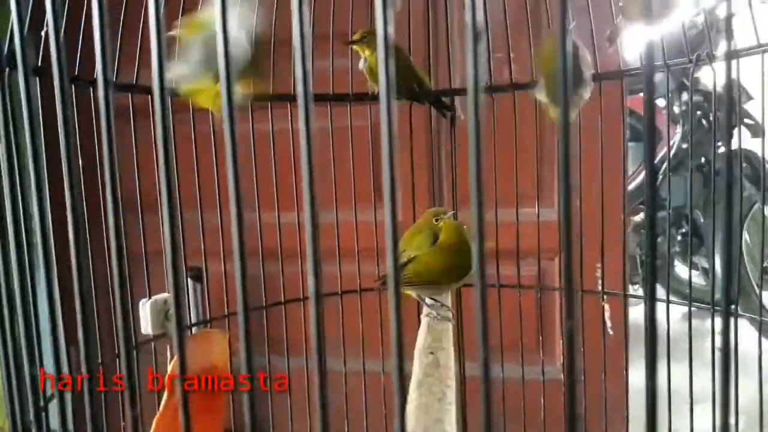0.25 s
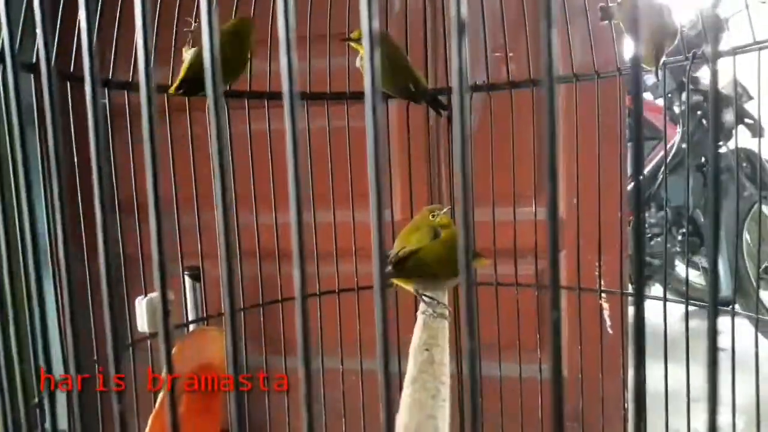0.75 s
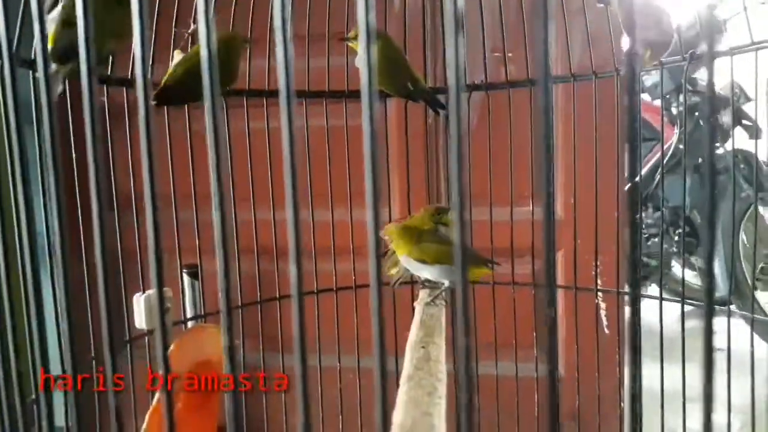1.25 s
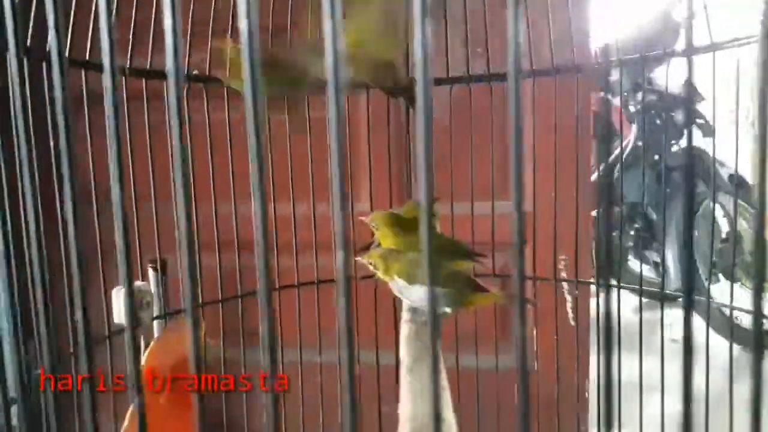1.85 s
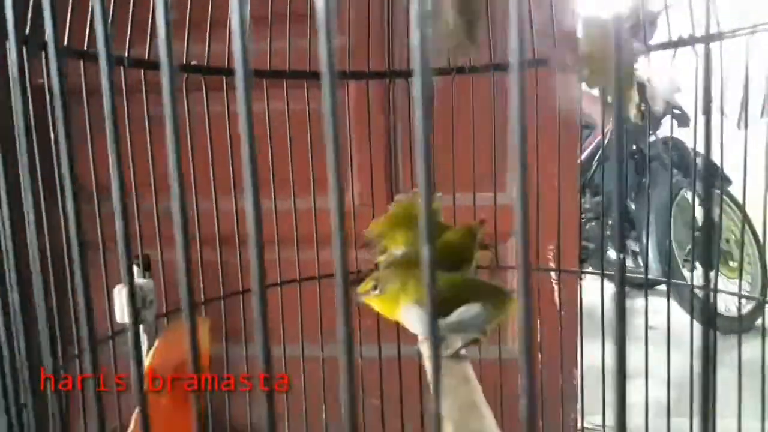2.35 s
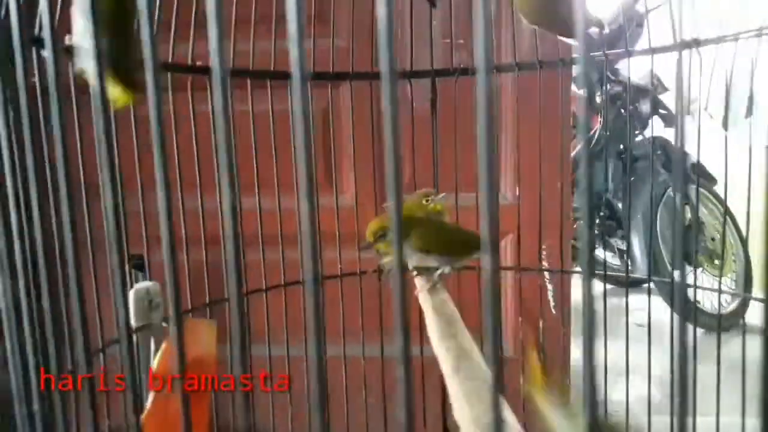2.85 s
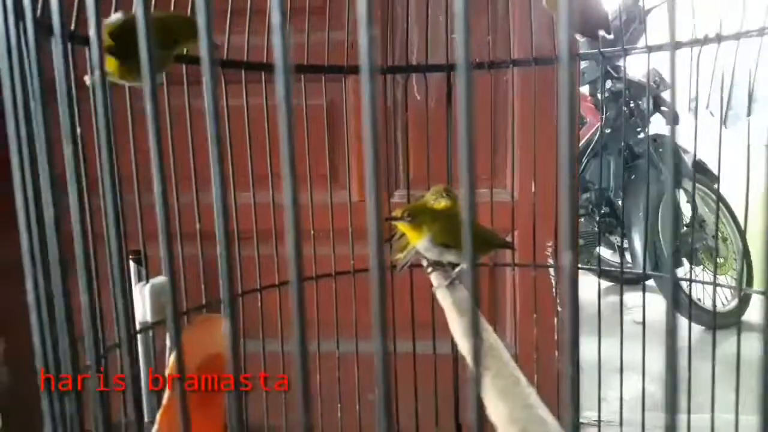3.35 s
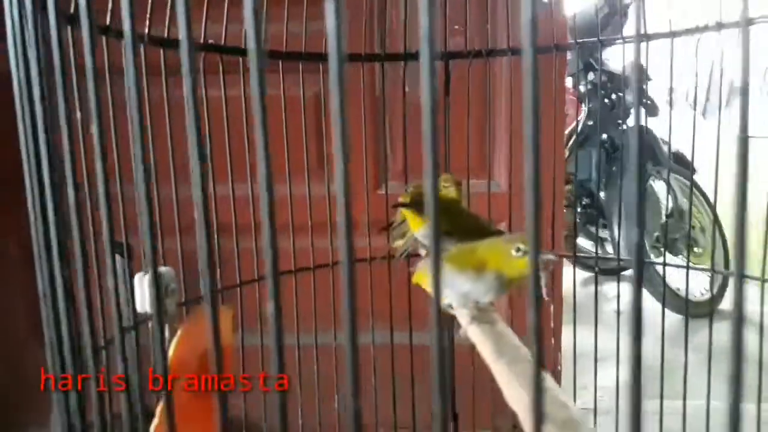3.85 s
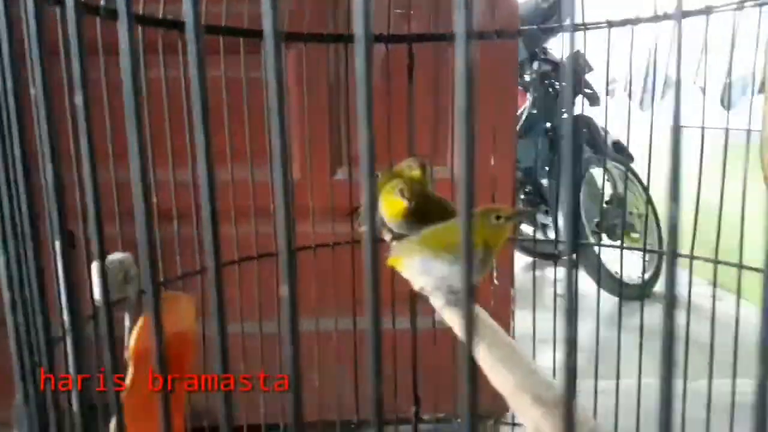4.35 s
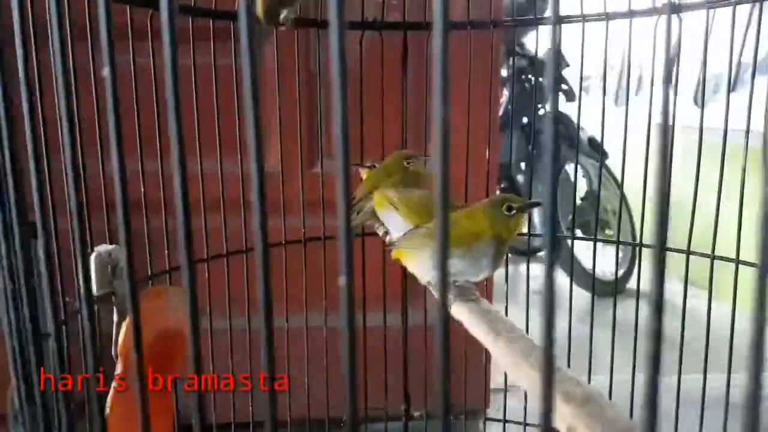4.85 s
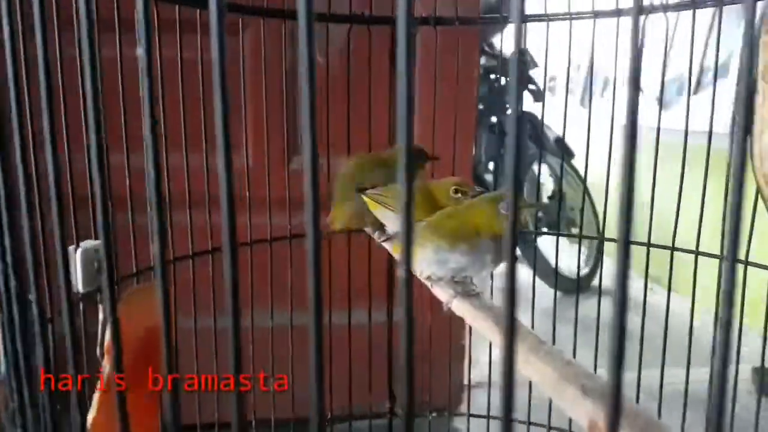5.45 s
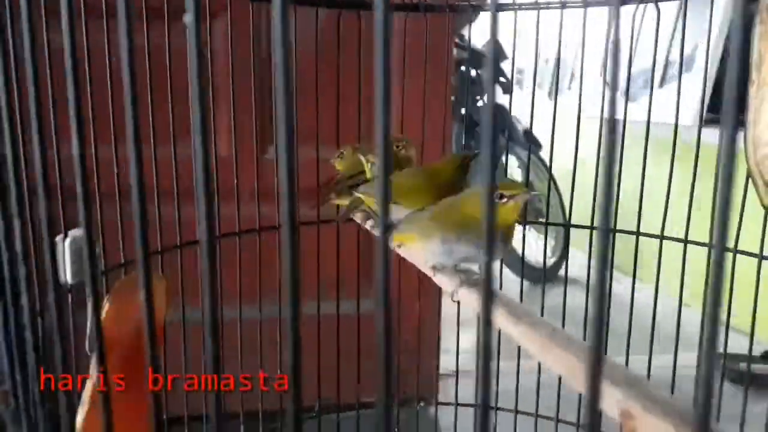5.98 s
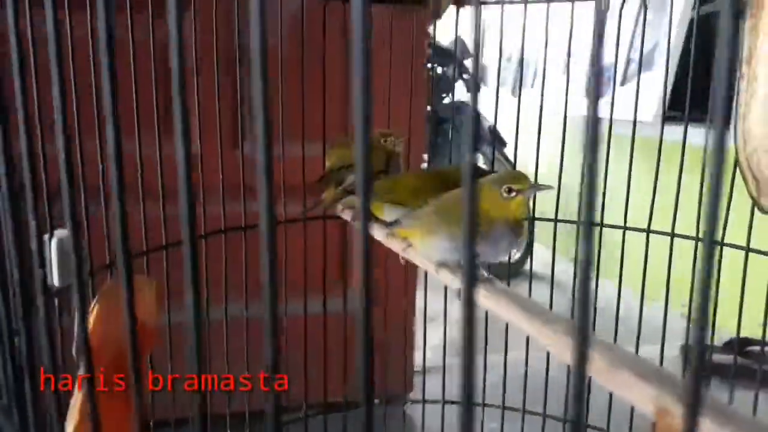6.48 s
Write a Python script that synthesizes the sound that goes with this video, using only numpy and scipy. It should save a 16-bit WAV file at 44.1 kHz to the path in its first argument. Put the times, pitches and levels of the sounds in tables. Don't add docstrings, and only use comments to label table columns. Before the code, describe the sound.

Loud, slightly buzzy chirps slide downward on the left, answered by a reedy bird mid-stage and fainter echoing ones right, in a hard-walled porch.

```python
import sys
import numpy as np
from scipy import signal
from scipy.io import wavfile
from scipy.ndimage import uniform_filter1d, map_coordinates

SR = 44100
rng = np.random.default_rng(int(sys.argv[2]) if len(sys.argv) > 2 else 0)


def generate_wav(sig):
    pcm = np.round(np.clip(np.atleast_2d(sig).T, -1, 1) * 32767).astype(np.int16)
    wavfile.write(sys.argv[1], SR, pcm)


def boost(x):
    u = np.asarray(x, float) / 20
    return 10 ** u


N = 296352


def along(points, hz):
    f, v = np.transpose(points)
    return np.interp(np.log(hz + 1), np.log(f + 1), v)


def wobble(rate_hz, size=N):
    knots = rng.standard_normal(int(size * rate_hz / SR) + 4)
    return map_coordinates(knots, [np.arange(size) * rate_hz / SR])


def level(rows):
    return boost(np.interp(np.arange(N) / SR, *np.transpose(rows)))


def rush(spectrum, alike, patchy_db):
    hz, _, z = signal.stft(rng.standard_normal((2, N)), SR, nperseg=1024)
    field = rng.standard_normal(z.shape[1:])
    field = uniform_filter1d(uniform_filter1d(field, size=8, axis=0), size=5, axis=1)
    patches = boost(patchy_db * field / field.std())
    turn = np.arccos(np.clip(along(alike, hz), -1, 1)) / 2
    colour = boost(along(spectrum, hz)) * np.array([np.cos(turn), np.sin(turn)])
    mid, side = signal.istft(z * colour[..., None] * patches, SR, nperseg=1024)[1][:, :N]
    pair = np.array([mid + side, mid - side])
    return pair / pair.std()


def whistles(calls, trill_hz, trill_depth, scoop, jitter, flutter_db, overtones=(), edge=0.00038,
             lead=0.000964, settled=0.76, calm_s=0.059, wander=0.811, pulse_db=0, scoop_s=.004):
    out = np.zeros(N + SR)
    for call in calls:
        s, hz, db = np.transpose(call)
        t = np.arange(max(s[0] - lead, 0), s[-1], 1 / SR)
        size = len(t)
        age, left = t - t[0], t[-1] - t
        note_hz, note_db = np.interp(t, s, hz), np.interp(t, s, db)
        onset = np.exp(-(age / scoop_s) ** 2) * (t[0] > .01)
        fresh = settled + np.exp(-age / calm_s)

        rate_hz = trill_hz * (1 + 0.11 * wobble(26, size))
        turn = 2 * np.pi * np.cumsum(rate_hz) / SR - np.pi * (1 + .08 * rng.standard_normal())
        trill = fresh * (1 - onset) * (np.sin(turn) - .25 * np.sin(2 * turn))

        shake = fresh * wobble(299.7, size) + wander * wobble(45.62, size)
        end_drop = 0.056 * np.exp(-left / 0.0042)
        bend = trill_depth * trill + jitter * shake - scoop * onset - end_drop
        phase = 2 * np.pi * np.cumsum(note_hz * (1 + bend)) / SR
        tone = boost(-21 * onset) * np.sin(phase)

        lead_db = 8 * np.exp(-age / .04)
        rasp = .2 + 1.1 * np.exp(-age / .05)
        sung_db = .6 * (db.max() - note_db)
        for multiple, over_db in overtones:
            onset_db = onset * (13 if multiple == 2 else -20)
            unsteady_db = 3 * wobble(70, size)
            gain_db = over_db + lead_db * (1 + multiple % 1) + onset_db + sung_db + unsteady_db
            tone += boost(gain_db) * np.sin(multiple * phase + rasp * wobble(900, size))

        flutter = fresh * wobble(148.3, size) + 0.16 * trill
        gain = boost(note_db + 4.5 + flutter_db * flutter + pulse_db * (trill - fresh + settled))
        fade = np.clip(np.minimum(2 * age, left) / edge, 0, 1)
        out[round(t[0] * SR):][:size] += tone * gain * fade
    return out[:N]


def falls(rows, hold, sag, ease=1, swell_db=0, fade_db=0):
    u = np.linspace(0, 1, num=16)
    up = (1 - np.clip((u - hold) / (1 - hold), 0, 1) ** ease) ** sag
    shape_db = -swell_db * (1 - u) ** 4 - fade_db * u ** 4
    calls = []
    for s, size, top, end, db in rows:
        hz = end + (top - end) * up
        calls.append(np.transpose([s + size * u, hz, db + shape_db]))
    return calls


def swells(rows, rise, hold, start_db, end_db):
    shape = [(0, start_db), (rise, 0), (rise + hold, 3), (1, end_db)]
    return [[(s + u * size, hz, db - less) for u, less in shape] for s, size, hz, db in rows]


def rings(events, attack, t60, blur):
    out, t = np.zeros(N + SR), np.arange(SR // 3) / SR
    for s, db, hz in events:
        phase = 2 * np.pi * hz * np.cumsum(1 + blur * wobble(120, len(t))) / SR
        decay = boost(db - 60 * t / t60)
        out[round(s * SR):][:len(t)] += decay * (1 - np.exp(-t / attack)) * np.sin(phase)
    return out[:N]


# frequency in Hz, t60 in seconds.
PORCH_T60 = [(1000, 1), (3500, 0.35), (5500, 0.36), (12000, 0.31)]


def porch(x, wet_db, early=0.0067, count=3):
    out, turn = 0, (np.arange(N) // (SR // 5)) % count
    for k in range(count):
        hz, t, z = signal.stft(rng.standard_normal(SR * 2 // 3), SR, nperseg=256)
        decay = boost(-60 * t / along(PORCH_T60, hz)[:, None])
        tail = signal.istft(z * decay, SR, nperseg=256)[1]
        tail = tail * (1 + 1.4 * np.exp(-np.arange(len(tail)) / SR / early))
        share = uniform_filter1d((turn == k) * 1., size=900)
        delayed = np.pad(tail, (60, 0)) / np.linalg.norm(tail)
        out = out + signal.fftconvolve(x * share, delayed)[:N]
    return boost(wet_db) * out


# frequency in Hz, density in dB per Hz.
STREET_SPECTRUM = [(35, -17), (88, -11.5), (150, 1.5), (660, -8), (770, -6.5), (1430, -7.5), (1890, -6.5),
                   (4340, -9), (5140, -10), (6000, -47), (7800, -49), (13200, -120)]
# time in seconds, level in dB.
STREET_LEVEL_DB = [(0.0, -41), (0.56, -44), (6.72, -42.5)]
# frequency in Hz, left-right likeness from 0 to 1.
STREET_ALIKE = [(100, 0.76), (500, 0.61), (1500, 0.92), (4000, 0.89), (12000, 0.61)]
# frequency in Hz, density in dB per Hz.
HISS_SPECTRUM = [(4500, -54), (5800, 3.5), (6600, 0.5), (8000, -4.5), (14500, -7), (15600, -36)]
# time in seconds, level in dB.
HISS_LEVEL_DB = [(0, -50.5), (1.5, -51.5), (3, -49.5), (3.9, -54), (5, -53), (6.72, -51.5)]


def street_and_leaves():
    street = boost(4.5) * level(STREET_LEVEL_DB) * rush(STREET_SPECTRUM, STREET_ALIKE, patchy_db=1.8)
    hiss = level(HISS_LEVEL_DB) * rush(HISS_SPECTRUM, [(8000, 0.78)], patchy_db=2)
    return street + hiss


# frequency in Hz, density in dB per Hz.
RUMBLE_SPECTRUM = [(12, -48), (20, -4), (49, 6), (81, -8), (113, -2), (250, -15), (320, -18), (550, -120)]
# time in seconds, level in dB.
RUMBLE_LEVEL_DB = [(0.0, -46.5), (1.83, -67.5), (6.66, -56), (6.72, -50)]
# time in seconds, level in dB.
MOTOR_LEVEL_DB = [(0, -53), (.45, -40), (.8, -53), (1.8, -51), (2.8, -49), (3.3, -55.5), (6.72, -50)]


def rumble_and_motor():
    rumble = boost([[-22], [4]]) * level(RUMBLE_LEVEL_DB) * rush(RUMBLE_SPECTRUM, [(50, .1)], patchy_db=1.5)
    shaft = 2 * np.pi * np.cumsum(55.3 * (1 + .06 * wobble(12))) / SR
    firing = np.sin(shaft) * boost(3 * wobble(7))
    octave = np.sin(2 * shaft) * boost(4 + 3 * wobble(9))
    rumble[1] += level(MOTOR_LEVEL_DB) * (firing + octave)
    return rumble


# time in seconds, pitch in Hz, level in dB.
LEFT_QUICK = [
    [(0.0, 5064, -9.5), (0.012, 4990, -15.5), (0.028, 4770, -12), (0.048, 4100, -20), (0.072, 3745, -19.5),
     (0.096, 3530, -20), (0.11, 3220, -33)],
    [(2.092, 5210, -18), (2.1, 5540, -21), (2.108, 5690, -17.5), (2.116, 5310, -13), (2.124, 4960, -10.5),
     (2.166, 4420, -23), (2.178, 4072, -21)],
    [(2.346, 4830, -16.5), (2.354, 4756, -28), (2.37, 4540, -20.5), (2.382, 4140, -21.5),
     (2.408, 3690, -24), (2.428, 3550, -27), (2.436, 3380, -32)],
    [(3.508, 5020, -15.5), (3.52, 5050, -16.5), (3.532, 4640, -16), (3.538, 4780, -16.5), (3.55, 4120, -21),
     (3.578, 3700, -19), (3.618, 3356, -30.5)],
    [(3.688, 5650, -20.5), (3.698, 5770, -27), (3.71, 5300, -11.5), (3.724, 4850, -15.5), (3.76, 4450, -19),
     (3.792, 3746, -20), (3.828, 3667, -24)],
    [(5.895, 4800, -17), (5.909, 4310, -23.5), (5.917, 4480, -22), (5.925, 3950, -22), (5.945, 3550, -24.5),
     (5.953, 3670, -19.5), (5.963, 3570, -27)],
    [(6.364, 5210, -13), (6.37, 5560, -18), (6.384, 5470, -11.5), (6.402, 4793, -12), (6.428, 4530, -19.5),
     (6.434, 4180, -23), (6.442, 4400, -19)],
]
# time in seconds, pitch in Hz, level in dB.
LEFT_WINDING = [
    [(1.762, 4800, -15), (1.78, 5190, -20.5), (1.803, 5106, -8.5), (1.835, 4450, -22.5), (1.862, 4200, -18),
     (1.885, 4360, -23), (1.904, 4490, -20), (1.974, 3616, -21.5), (1.984, 3640, -28)],
    [(2.556, 5230, -17), (2.578, 5380, -16.5), (2.6, 5097, -10), (2.62, 4700, -20.5), (2.638, 4245, -20),
     (2.694, 3870, -22), (2.726, 3690, -22), (2.734, 3550, -30)],
    [(3.312, 5060, -17), (3.322, 5124, -11.5), (3.35, 5310, -16), (3.368, 5140, -12.5), (3.382, 4593, -21),
     (3.398, 4380, -21), (3.448, 4230, -26), (3.454, 4120, -11)],
    [(5.418, 5450, -22), (5.428, 5550, -24), (5.442, 5090, -13.5), (5.464, 4413, -18.5), (5.472, 4460, -21),
     (5.526, 4010, -22), (5.56, 3640, -20), (5.574, 3600, -28)],
    [(5.624, 4950, -19), (5.644, 5080, -12.5), (5.67, 5067, -10), (5.71, 4440, -19), (5.722, 4140, -20.5),
     (5.746, 3700, -19), (5.77, 3520, -31)],
    [(6.08, 5100, -14.5), (6.1, 5020, -13), (6.112, 4745, -14.5), (6.13, 4570, -15.5), (6.16, 4526, -17),
     (6.184, 4575, -18), (6.2, 4085, -17), (6.288, 3667, -21.5), (6.298, 3740, -19)],
    [(1.1, 5040, -19), (1.113, 5290, -13), (1.147, 4440, -16.5), (1.169, 4310, -18), (1.183, 4270, -23),
     (1.197, 3990, -16.5), (1.231, 3536, -24.5), (1.239, 3410, -38)],
    [(1.299, 5400, -24.5), (1.313, 5454, -18), (1.351, 5150, -12), (1.357, 5060, -14), (1.365, 4770, -14.5),
     (1.371, 4800, -42)],
]


def left_trilled_calls():
    return whistles([*LEFT_QUICK, *LEFT_WINDING], 128, .032, scoop=.15, jitter=.008, flutter_db=1.5,
                    overtones=[(2, -47)], edge=.003, lead=.005, settled=.55, calm_s=.04, wander=.5,
                    pulse_db=2.6)


def unseen_flock(rate, db):
    draws = rng.random((int(rate * N / SR), 4))
    starts = (np.arange(len(draws)) + draws[:, 0]) / rate
    calls = []
    for s, (a, b, c) in zip(starts, draws[:, 1:]):
        calls.append([(s, 4800 + 800 * a, db),
                      (s + 0.019, 4550 + 800 * a, db + 8 * c),
                      (s + 0.12 + 0.088 * b, 3400 + 500 * c, db)])
    return whistles(calls, 125.7, 0.02, scoop=0.038, jitter=0.015, flutter_db=1.5)


def wire_ticks():
    spots = rng.random((70, 3))
    events = zip(spots[:, 0] * N / SR, -43 + 7 * spots[:, 1], 900 + 1400 * spots[:, 2])
    return rings(events, 0.0018, 0.14, 0.017)


# time in seconds, pitch of strongest partial in Hz, level in dB.
MIDDLE_CALLS = [
    [(.14, 4600, -18), (.152, 4560, -13), (.17, 4300, -11.5), (.2, 3945, -15), (.278, 3550, -17.5),
     (.298, 3360, -33), (.308, 3150, -19)],
    [(.615, 4400, -26), (.632, 4350, -16), (.646, 4220, -10.5), (.657, 4100, -16), (.668, 3740, -24),
     (.69, 3380, -26.5), (.712, 3090, -31)],
    [(2.808, 4420, -16), (2.826, 4484, -11.5), (2.852, 4210, -16.5), (2.866, 3890, -27),
     (2.895, 3640, -16.5), (2.914, 3510, -28), (2.952, 3420, -20.5)],
    [(4.612, 4480, -19.5), (4.635, 4530, -17.5), (4.654, 4340, -12.5), (4.7, 3960, -15),
     (4.76, 3650, -13.5), (4.786, 3480, -17.5), (4.796, 3160, -30)],
]
REED_DB = [-31, -29, -46, -36.5, -44]


def middle_bird():
    reed = list(zip(np.arange(3, 8) / 2, REED_DB))
    middle = whistles(MIDDLE_CALLS, 120, .068, scoop=.24, jitter=.007, flutter_db=3, overtones=reed,
                      edge=.007, lead=.009, settled=.15, calm_s=.05, wander=.4, pulse_db=1.8, scoop_s=.006)
    return middle + porch(middle, -10.5)


# time in seconds, pitch in Hz, level in dB.
LEFT_PLAIN = [
    [(0.176, 6050, -17), (0.182, 5630, -17.5), (0.196, 5645, -18), (0.218, 4784, -12.5), (0.282, 3756, -24),
     (0.312, 3710, -19.5)],
    [(0.563, 4500, -25.5), (0.586, 4390, -19.5), (0.61, 4068, -22), (0.622, 3600, -18), (0.628, 3630, -23),
     (0.638, 3520, -32)],
    [(0.756, 4230, -26), (0.766, 4000, -23), (0.794, 4080, -20), (0.814, 3660, -19.5), (0.828, 3595, -20),
     (0.84, 3420, -31)],
    [(0.896, 5046, -16), (0.928, 4970, -11.5), (0.992, 3730, -21), (1.024, 3600, -19), (1.032, 3430, -27.5),
     (1.038, 3300, -32)],
    [(1.409, 4288, -23), (1.423, 4420, -21), (1.439, 4080, -19.5), (1.459, 3752, -20.5),
     (1.471, 3560, -22.5), (1.485, 3430, -37)],
    [(2.822, 5080, -16), (2.862, 4470, -18.5), (2.896, 3780, -19.5), (2.914, 3752, -22.5),
     (2.926, 3550, -25.5), (2.948, 3520, -32)],
    [(3.054, 4760, -21), (3.086, 4094, -22.5), (3.106, 3930, -30), (3.112, 3600, -34), (3.124, 3540, -29),
     (3.134, 3520, -31)],
    [(3.178, 4297, -27), (3.194, 4050, -24.5), (3.206, 3850, -28.5), (3.218, 3750, -29), (3.232, 3610, -28),
     (3.238, 3360, -29)],
    [(6.612, 4295, -30), (6.622, 4240, -27.5), (6.636, 4360, -20), (6.652, 4095, -18.5),
     (6.67, 3590, -26.5), (6.694, 3590, -29.5)],
]


def left_plain_calls():
    return whistles(LEFT_PLAIN, 135, .012, scoop=.2, jitter=.009, flutter_db=1.2, overtones=[(2, -47)],
                    edge=.004, lead=.006, settled=.7, wander=.3)


# start in seconds, length in seconds, top in Hz, end in Hz, level in dB.
RIGHT_CALLS = [(.22, 0.22, 5800, 4500, -34), (.63, 0.12, 5430, 4930, -30.5),
               (.825, 0.27, 5350, 3490, -28.5), (1.06, 0.05, 5370, 4750, -28),
               (1.25, 0.13, 5300, 3660, -36), (1.5, 0.23, 4530, 3440, -28.5), (1.62, 0.13, 5340, 3550, -34),
               (1.83, 0.11, 5330, 3400, -25.5), (2.52, .16, 5000, 3430, -29), (2.72, .08, 4900, 4800, -34),
               (2.96, 0.036, 5350, 5250, -29.5), (3.18, 0.052, 5520, 3710, -26),
               (3.34, 0.1, 5300, 3570, -28), (3.485, 0.14, 5020, 3230, -27.5),
               (3.77, 0.13, 5160, 3770, -52), (4.025, 0.095, 4800, 4150, -38),
               (2.03, 0.065, 5240, 5200, -38), (4.265, 0.24, 5245, 3840, -30.5),
               (4.575, 0.085, 5360, 4660, -25), (5.08, 0.11, 5570, 4760, -36),
               (5.075, 0.05, 4900, 3800, -29), (5.26, 0.19, 5150, 3440, -29.5),
               (5.44, 0.14, 4760, 3690, -29), (5.75, 0.2, 5000, 3635, -27.5),
               (6.226, 0.08, 5150, 3950, -32), (6.31, 0.14, 5240, 3510, -27.5),
               (6.56, 0.18, 5030, 3880, -27)]


def right_birds():
    right = whistles(falls(RIGHT_CALLS, .1, 2.0, swell_db=2.5, fade_db=10.5), 131.2, 0.025, scoop=0.09,
                     jitter=0.0091, flutter_db=2, edge=.005)
    unseen = porch(unseen_flock(24, -42.5), 0.55)
    return 0.47 * right + porch(right + unseen, -0.74)


# start in seconds, length in seconds, pitch in Hz, peak in dB.
THIN_SQUEAKS = [(.56, .07, 11000, -56), (2.8, .05, 10600, -48), (1.63, .14, 11000, -61),
                (2.33, 0.22, 10580, -39), (3.83, 0.13, 10550, -60), (5.48, 0.27, 11030, -47.5),
                (6.24, 0.094, 10900, -60), (2.1, 0.42, 13200, -60), (3.36, 0.21, 12900, -60),
                (4.09, 0.27, 13100, -56), (4.89, 0.17, 13400, -55), (5.25, 0.081, 13300, -55),
                (6.29, 0.16, 13400, -58)]
# start in seconds, length in seconds, first pitch in Hz, end in Hz, level in dB.
STRAY_COOS = [
    (0.62, 0.021, 2880, 3000, -38.5),
    (6.02, 0.059, 2630, 2520, -43),
    (6.3, 0.11, 2880, 2940, -41.5),
    (5.935, 0.026, 2680, 2650, -45),
]


def thin_notes():
    notes = swells(THIN_SQUEAKS, 0.088, 0.16, start_db=10, end_db=28) + falls(STRAY_COOS, 0.008, 0.94)
    return whistles(notes, 42.7, 0.0019, scoop=.001, jitter=0.0034, flutter_db=3.0)


# start in seconds, peak in dB, pitch in Hz.
PIP_EVENTS = [(0.9737, -18.5, 2290), (1.5579, -21, 2380), (1.8542, -18.5, 2360), (4.0617, -23, 2390),
              (4.2009, -16, 2410), (4.35, -15, 2390), (4.4114, -41, 2280), (4.5196, -23, 2360),
              (4.6688, -22, 2390), (4.8314, -24, 2390), (4.9741, -18.5, 2370), (6.2911, -21.5, 2420),
              (6.4208, -8, 2400), (6.458, -29, 2430), (6.49, -30, 2390), (6.515, -25, 2410),
              (6.542, -30, 2390), (6.568, -18.5, 2420), (6.59, -26, 2400), (6.612, -33, 2420)]


def pips():
    return rings(PIP_EVENTS, .007, .06, .014)


# start in seconds, peak in dB, pitch in Hz.
PERCH_KNOCKS = [(1.689, -30, 2000), (1.937, -19.5, 1448), (2.149, -31, 1218), (2.219, -25.5, 2010),
                (2.349, -26, 1560), (2.855, -31, 1160), (2.963, -28.5, 1490), (4.132, -19, 1663),
                (4.198, -27.5, 1194), (4.487, -28.5, 1154), (4.561, -30, 1980), (5.042, -18, 1605),
                (5.443, -25, 1986), (5.526, -29, 1200), (1.262, -31.5, 1164), (1.936, -26, 1740),
                (2.616, -29, 1970), (2.645, -29, 1600), (3.008, -32.5, 1060), (3.578, -27, 1830),
                (4.035, -36, 2100), (4.28, -33, 1620), (4.332, -33, 1870), (4.629, -30, 1133),
                (5.239, -27, 1695), (5.303, -26, 2160), (5.36, -30, 1610), (5.377, -35, 1140),
                (5.815, -31, 1220), (5.855, -29.5, 1060), (5.974, -36, 1040), (6.205, -30, 1146),
                (6.389, -39, 616)]


def perch_knocks():
    return rings(PERCH_KNOCKS, .008, .09, .02)


# start in seconds, length in seconds, top in Hz, end in Hz, level in dB.
FAR_LEFT_CALLS = [
    (1.65, 0.1, 4730, 3870, -42.5),
    (3.24, 0.074, 4850, 4530, -44),
    (4.15, 0.062, 4870, 3460, -42),
    (4.33, 0.13, 4660, 3610, -42),
    (4.52, 0.061, 4230, 4020, -45),
    (4.69, 0.11, 5180, 4020, -40.5),
    (4.95, 0.087, 4860, 3394, -39),
]


def far_left_birds():
    calls = falls(FAR_LEFT_CALLS, 0.0582, 1.6)
    far = whistles(calls, 143.1, 0.062, scoop=0.041, jitter=0.0174, flutter_db=1.5)
    return boost(17.0) * porch(far + unseen_flock(4.7, -70.0), 0, count=1)


# start in seconds, length in seconds, peak in dB.
TRILL_BEADS = [
    (1.718, 0.12, -43),
    (1.859, 0.15, -33),
    (1.99, 0.18, -34.5),
    (2.152, 0.11, -32.5),
    (2.248, 0.2, -45.5),
    (2.416, 0.13, -35),
    (2.62, 0.27, -53),
    (3.186, 0.16, -37),
    (3.315, 0.23, -39.5),
]


def distant_triller():
    notes = [(s, size, 2590, db) for s, size, db in TRILL_BEADS]
    return whistles(swells(notes, 0.45, 0.045, start_db=3.5, end_db=17), 23.2, 0.01, scoop=0.0071,
                    jitter=0.0042, flutter_db=2.5, pulse_db=2.5)


# start in seconds, length in seconds, top in Hz, end in Hz, level in dB.
LEFT_CUT = [
    (1.845, 0.0402, 4800, 4400, -17),
    (3.182, .03, 5500, 4700, -27.5),
    (2.481, 0.017, 4000, 3620, -17),
    (5.998, 0.015, 3900, 3700, -17.5),
]


def left_cut_calls():
    return whistles(falls(LEFT_CUT, .3, 1.5, swell_db=4.5, fade_db=8), 135, .01, scoop=.1, jitter=.004,
                    flutter_db=1, lead=.005)


# start in seconds, length in seconds, first pitch in Hz, end in Hz, level in dB.
HEN_CLUCKS = [
    (5.535, 0.13, 765, 670, -43),
    (5.72, 0.072, 770, 710, -46),
    (6.39, 0.13, 623, 508, -45.5),
]


def far_hen():
    return whistles(falls(HEN_CLUCKS, 0.295, 1.11, swell_db=0, fade_db=15), 29, .004, scoop=0.044,
                    jitter=0.0073, flutter_db=3.0, overtones=[(2, -9), (3, -14)], edge=.01)


def scene():
    left = left_cut_calls() + boost(8.5) * (left_trilled_calls() + left_plain_calls())
    left = left + porch(left + far_left_birds(), -6.5)
    middle = middle_bird()
    right = right_birds()
    small = wire_ticks() + thin_notes() + pips() + perch_knocks() + distant_triller() + far_hen()
    small = small + porch(small, -11, count=2)
    backdrop = boost([[-1.1], [.9]]) * (small + street_and_leaves())
    return np.array([left, right]) + boost([[-2], [-.5]]) * middle + backdrop + rumble_and_motor()


def band_limit(x):
    return signal.sosfilt(signal.butter(12, 15770, fs=SR, output="sos"), x)


def record(dry):
    mix = np.clip(dry, -.99, .99)
    return band_limit(mix)


dry = scene()
out = record(dry)
generate_wav(out)
```